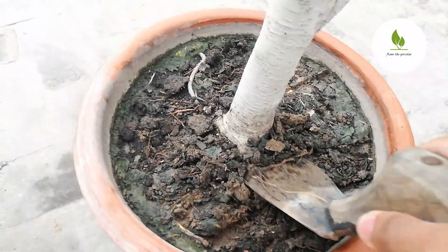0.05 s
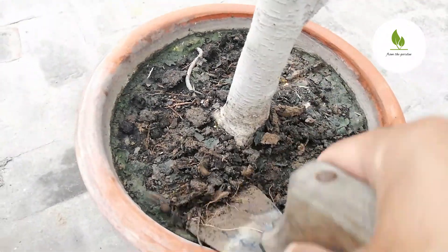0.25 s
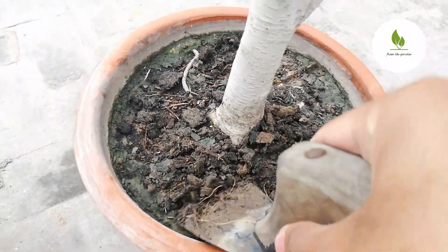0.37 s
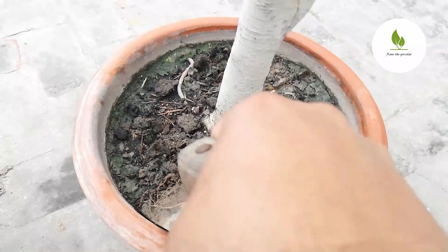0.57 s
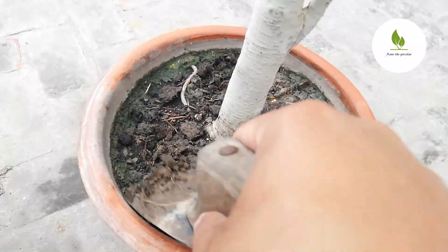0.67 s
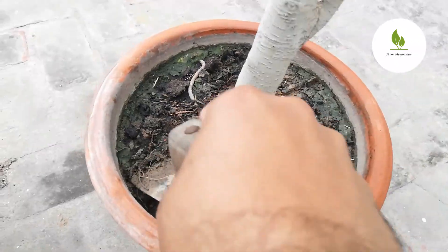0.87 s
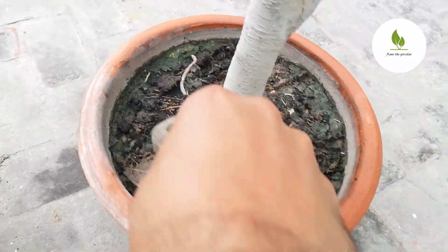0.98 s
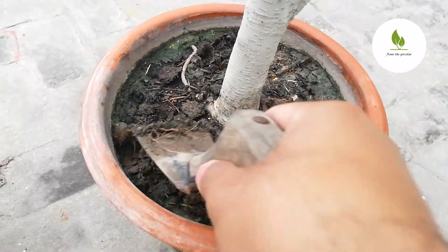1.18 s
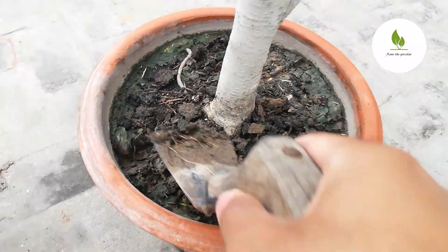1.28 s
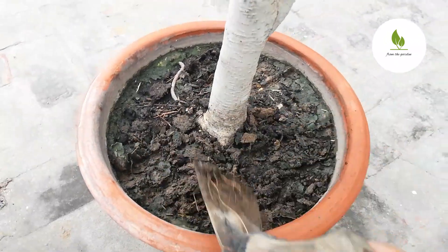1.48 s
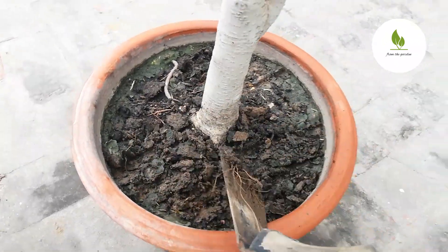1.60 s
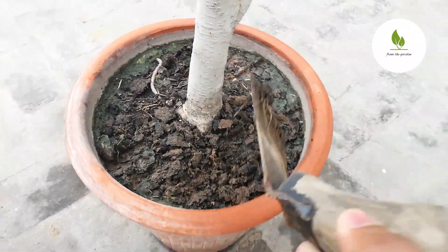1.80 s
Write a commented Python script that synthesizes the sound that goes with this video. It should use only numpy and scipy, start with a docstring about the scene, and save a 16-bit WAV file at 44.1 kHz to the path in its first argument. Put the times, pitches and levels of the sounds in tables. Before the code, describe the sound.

A small steel trowel knocks sharply against a clay pot of soil at about 0.2 seconds, close up. Short gritty scrapes and lighter, damped clinks follow until 0.8 seconds. Soil then rustles with a fine hiss and ticking crumbs, mostly on the left, until about 1.3 seconds. Two more hard knocks land near 1.4 and 1.55 seconds, then a faint clink. A low outdoor rumble runs underneath.

```python
"""A paved yard, close up on a small steel trowel working the soil in a clay pot.
The blade strikes the pot and knocks on clods, each contact a crack with a short, damped ring.
It scrapes along the gritty wall, and crumbs tick. A rustling hiss leans left over a low rumble.
Hard strikes clip the recorder and duck its gain."""
import sys
import numpy as np
from scipy import signal
from scipy.fft import rfft, irfft, next_fast_len
from scipy.io import wavfile
from scipy.ndimage import minimum_filter1d, map_coordinates

SR = 44100
rng = np.random.default_rng(int(sys.argv[2]) if len(sys.argv) > 2 else 0)


def dump_mix(stems):
    """Bounce the given channels to the path in sys.argv[1] as a 16-bit WAV at rate SR."""
    frames = np.atleast_2d(stems).T  # one column per channel
    limited = np.clip(frames, -1, 1)  # hard clip at full scale
    pcm = np.round(limited * 32767).astype(np.int16)
    wavfile.write(sys.argv[1], SR, pcm)


N = 81585

# Blade hits on pot and clods. Each row: start, skid and t60 in seconds, left lean in dB,
# the two most excited resonances in Hz, then six band levels in dB from low to high.
BLADE_HITS = [(0.2217, 0.0039, 0.0051, 2.5, 2976, 6240, -15.5, -11.5, -19, 0.5, -2, -7),
              (0.4292, 0.002, 0.038, 0.5, 870, 1410, -21, -35, -17.5, -20.5, -31.5, -27.5),
              (0.6592, 0.0015, 0.018, 1.5, 1643, 7000, -32, -45, -11.5, -24.5, -25, -24.5),
              (0.6737, 0.001, 0.02, 1, 1760, 8700, -31, -35, -24, -23.5, -27, -21),
              (0.6953, 0.00058, 0.021, 1, 1740, 8200, -25.5, -31, -9.5, -25, -28, -24.5),
              (0.7393, 0.0015, 0.036, 7, 1810, 8800, -19, -25, -12.5, -16.5, -22, -17),
              (1.4278, 0.0026, 0.014, 1, 2260, 6200, -24, -22, -10.5, -6.5, -4.5, -7),
              (1.465, 0.003, 0.033, -1, 2140, 4100, -48, -50, -35, -38, -45, -49),
              (1.5448, 0.0033, 0.02, 0, 4110, 9480, -23.5, -15, -10, -7.5, -9.5, -6.5),
              (1.6325, 0.0011, 0.097, 0.5, 1200, 1650, -36, -30.5, -33, -32, -39, -35)]


def knocks():
    """The blade hits the pot or a clod, skids for an instant and is damped at once."""
    out = np.zeros((2, N))
    for start, skid_s, t60, left_db, low_hz, high_hz, *band_dbs in BLADE_HITS:
        hit = contact(t60, (low_hz, high_hz), skid_s)
        add(out, start, lean(left_db) * voiced(hit, band_dbs, length_s=0.0023))
    return out


# Drags along the pot wall. Each row: time of full force, hold, rise and fall in seconds, left lean
# in dB, the two most excited resonances in Hz, then six band levels in dB from low to high.
BLADE_DRAGS = [(0.242, 0.0033, 0.011, 0.012, -0.5, 3080, 9900, -54, -34.5, -26.5, -29, -27, -21),
               (0.441, 0.049, 0.011, 0.0099, 0.5, 1460, 3440, -43, -41.5, -36, -33, -37, -36),
               (0.4935, 0.011, 0.014, 0.01, 0.5, 1457, 2690, -28, -26, -21.5, -19.5, -18, -20),
               (0.7469, 0.0088, 0.00049, 0.0023, -1, 2490, 8470, -25, -43, -20, -22.5, -15, -13)]


def scrapes(points=4):
    """Grit catches at several points of the blade and rings it as the force swells and lets go."""
    out, t = np.zeros((2, N)), np.arange(N) / SR
    for peak, hold, rise, fall, left_db, low_hz, high_hz, *band_dbs in BLADE_DRAGS:
        force = np.exp(np.minimum(t - peak, 0) / rise - np.maximum(t - peak - hold, 0) / fall)
        start = round(max(peak - .12, 0) * SR)
        rub = 0
        for _ in range(points):
            catches = force * grit(per_s=970, spread_db=6.5)
            ring = contact(t60=0.025, excited_hz=(low_hz, high_hz))
            rub += signal.fftconvolve(catches[None, start:start + SR // 3], ring, axes=1)
        add(out, start / SR, lean(left_db) * voiced(rub, band_dbs, hold + (rise + fall) / 2))
    return out


# The damped ring of blade and pot. Each row: pitch in Hz, level in dB, multiple of the contact's t60.
BLADE_POT_MODES = [(870, -3.5, 1.02), (1095, 4, 2.5), (1385, -0.5, 1.43), (1724, 7, 0.74), (1820, 6, 1.15),
                   (2513, -0.5, 1.36), (2920, -9.5, 1.64), (3559, -1, 2.2), (4180, -5.5, 0.61),
                   (5227, 2, 0.38), (6023, 3.5, 0.3), (7278, 2.5, 0.78), (8355, 3.5, 0.35),
                   (8844, 1.5, 0.39), (9690, 2.5, 0.2)]
# The tone of the crack. Each row: frequency in Hz, level in dB.
CRACK_EQ = [(150, -3.5), (500, -6), (1000, 10.5), (4000, 2.5), (9800, 2.5), (11200, -9), (13500, -10),
            (16000, -66)]
CRACK_DB, ATTACK_S, LIFT_DB, LIFT_OCTAVES = 12, 0.00072, 8, 0.098


def contact(t60, excited_hz, skid_s=0):
    """One touch of steel, in stereo: short modes and a noisy crack, sustained while the edge skids."""
    def lift(hz):
        return LIFT_DB * sum(np.exp(-(np.log2((hz + 1) / f) / LIFT_OCTAVES) ** 2) for f in excited_hz)

    t = np.arange(SR // 10) / SR
    free_s = np.maximum(t - skid_s, 0)
    modes = 0
    for hz, db, life in BLADE_POT_MODES:
        level_db = db + lift(hz) + rng.normal(0, 1.74, (2, 1)) - 60 * free_s / (t60 * life)
        cycles = hz * t + rng.random() + rng.normal(0, 0.11, (2, 1))
        modes += amp(level_db) * np.sin(2 * np.pi * cycles)
    noise = filtered(rng.standard_normal((2, len(t))), lambda hz: amp(lift(hz)))
    crack = amp(CRACK_DB - 60 * free_s / t60) * coloured(noise, CRACK_EQ)
    return (modes + crack) * (1 - np.exp(-t / ATTACK_S))


# The edges of the six voicing bands in Hz, low to high.
BANDS_HZ = [200, 930, 1250, 2600, 4600, 7800, 15000]


def voiced(x, band_dbs, length_s):
    """The point of contact sets each band's level, with its energy counted over length_s."""
    out = 0
    for lo, hi, db in zip(BANDS_HZ, BANDS_HZ[1:], band_dbs):
        band = signal.sosfilt(signal.butter(4, [lo, hi], "band", fs=SR, output="sos"), x)
        rms = np.sqrt(np.sum(band ** 2, axis=1, keepdims=True) / (length_s * SR))
        out += amp(db) * band / rms
    return out


# Crumbs flicked off the blade. Each row: start in seconds, level in dB.
CRUMB_TICKS = [(0.029, -25.5), (0.551, -14.5), (0.812, -25), (1.1065, -10.5), (1.198, -11), (1.337, -24)]
# The fader ride on the hiss. Each row: time in seconds, level in dB.
HISS_RIDE = [(0, -38.5), (.18, -37), (.35, -40), (.6, -35.5), (.78, -23.5), (.87, -31), (.98, -28),
             (1.15, -27.5), (1.27, -28), (1.39, -36), (1.6, -39), (1.85, -36)]
# The bright tone of hiss and ticks. Each row: frequency in Hz, level in dB.
HISS_EQ = [(1500, -20.5), (3000, -15), (4300, -5.5), (7000, -5.5), (9600, 0.5), (11000, -9), (13500, -14.5),
           (15000, -30)]
# The hiss's pull to the left. Each row: frequency in Hz, cut on the right in dB.
RIGHT_CUT = [(1500, 11), (3300, 10), (5800, 10), (7500, 11.5), (10000, 19), (14000, 10)]
GRAIN_DB, FLICKER_DB, TICK_T60_S = -1.5, 1.75, 0.0081


def rustle():
    """A fine, flickering, grainy hiss with a few louder ticks, mostly on the left."""
    grains = np.array([grit(per_s=700, spread_db=5) for _ in range(2)])
    bed = coloured(rng.standard_normal((2, N)) + amp(GRAIN_DB) * grains, HISS_EQ)
    out = bed * amp(curve(HISS_RIDE) + FLICKER_DB * wobble(knots_per_s=59.95))
    t = np.arange(SR // 20) / SR
    for start, db in CRUMB_TICKS:
        burst = coloured(rng.standard_normal((2, len(t))), HISS_EQ)
        add(out, start, amp(db - 60 * t / TICK_T60_S) * burst)
    left, right = out
    return np.array([left, filtered(right, lambda hz: amp(-along(RIGHT_CUT, hz)))])


# The yard's decay. Each row: frequency in Hz, t60 in seconds.
YARD_DECAY = [(200, 0.6), (1100, 0.33), (1900, 0.15), (4000, 0.19), (12000, 0.081)]
TAIL_DB, WALL_DB, WALL_DELAY_S, WALL_SPREAD_S = -13, -23, 0.015, 0.051


def yard(x):
    """A scattered slap off the nearest wall and a short, faint tail."""
    hz, t, spectra = signal.stft(rng.standard_normal((2, SR // 2)), SR, nperseg=256)
    decay = amp(-60 * t / along(YARD_DECAY, hz)[:, None])
    tail = signal.istft(spectra * decay, SR, nperseg=256)[1]
    late = np.arange(tail.shape[1]) / SR - WALL_DELAY_S
    wall = rng.standard_normal(tail.shape) * (late > 0) * np.exp(-np.abs(late) / WALL_SPREAD_S)
    impulse = amp(TAIL_DB) * tail / np.linalg.norm(tail[0])
    impulse += amp(WALL_DB) * wall / np.linalg.norm(wall[0])
    return signal.fftconvolve(x, impulse, axes=1)[:, :N]


# The fader ride on the rumble. Each row: time in seconds, level in dB.
RUMBLE_RIDE = [(0, -33), (.13, -33.5), (.22, -41), (.42, -35), (.58, -38), (.68, -31), (.83, -37),
               (.93, -27.5), (1.08, -36.5), (1.2, -35), (1.36, -37), (1.55, -41), (1.85, -39)]
# The tones of the rumble and the air. Each row: frequency in Hz, level in dB.
RUMBLE_EQ = [(15, -38), (30, -5.5), (102, -10), (119, 6), (129, -5.5), (140, -0.5), (168, -9), (205, -15),
             (265, -13.5), (400, -27), (700, -50)]
AIR_EQ = [(100, 7), (400, 3), (1000, 3.5), (2500, -0.5), (6000, -6), (10000, -20), (15000, -16)]


def background(air_db=-44):
    """A low rumble in the centre and thin, wide outdoor air."""
    rumble = coloured(rng.standard_normal(N), RUMBLE_EQ) * amp(curve(RUMBLE_RIDE))
    return rumble + amp(air_db) * coloured(rng.standard_normal((2, N)), AIR_EQ)


def grit(per_s, spread_db):
    """Random tiny impacts of uneven size, at rms 1."""
    impacts = (rng.random(N) < per_s / SR) * rng.choice([-1, 1], N)
    return unit(impacts * amp(spread_db * np.clip(rng.standard_normal(N), -2, 2)))


def amp(db):
    """Decibels to gain."""
    return 10 ** (np.asarray(db) / 20)


def unit(x):
    """x scaled to rms 1."""
    return x / np.sqrt(np.mean(x ** 2) + 1e-20)


def along(points, hz):
    """(Hz, value) points read on a log axis."""
    f, v = np.transpose(points)
    return np.interp(np.log(hz + 1), np.log(f + 1), v)


def curve(rows):
    """(s, value) points joined up, one value per sample."""
    return np.interp(np.arange(N) / SR, *np.transpose(rows))


def wobble(knots_per_s):
    """A smooth random curve."""
    return map_coordinates(rng.standard_normal(400), [np.arange(N) * knots_per_s / SR], mode="wrap")


def filtered(x, response):
    """x through a frequency response."""
    n = x.shape[-1]
    size = next_fast_len(n + SR // 10)
    return irfft(rfft(x, size) * response(np.fft.rfftfreq(size, 1 / SR)), size)[..., :n]


def coloured(x, eq):
    """x through an EQ curve, at rms 1."""
    return unit(filtered(x, lambda hz: amp(along(eq, hz))))


def lean(left_db):
    """Left and right gains, left_db apart."""
    return amp(np.array([[.5], [-.5]]) * left_db)


def add(out, start_s, x):
    """Mix x into out from start_s."""
    part = out[:, round(start_s * SR):][:, :x.shape[1]]
    part += x[:, :part.shape[1]]


# The trowel's stereo tilt, duller on the right. Each row: frequency in Hz, left lean in dB.
MIC_SHADE = [(500, -3.5), (2500, 2), (4000, 5), (7000, 4), (9000, 11), (13000, 8)]
LEFT_DELAY_S = .00007


def scene():
    """The mix: the trowel reaches the right mic first and the left mic brighter."""
    def mics(hz):
        delay = np.exp(-2j * np.pi * hz * np.array([[LEFT_DELAY_S], [0]]))
        return lean(along(MIC_SHADE, hz)) * delay

    trowel = filtered(knocks() + scrapes(), mics)
    return trowel + yard(trowel) + rustle() + background()


THRESHOLD_DB, DUCK_SLOPE, RECOVER_DB_PER_S = -17, 0.49, 24
DETECT_S, DUCK_ATTACK_S, HOLD_S, TOP_HZ = 0.0063, 0.0038, 0.086, 15400


def record(dry):
    """Gain control ducks after loud blows, holds and recovers; the blows themselves clip."""
    def follow(x, lag_s):
        pole = np.exp(-1 / (lag_s * SR))
        return signal.lfilter([1 - pole], [1, -pole], x)

    level_db = 10 * np.log10(follow(np.mean(dry ** 2, axis=0), DETECT_S) + 1e-12)
    cut_db = DUCK_SLOPE * np.maximum(level_db - THRESHOLD_DB, 0)
    half = int(HOLD_S * SR / 2)
    held_db = -minimum_filter1d(-cut_db, 2 * half + 1, origin=half, mode="constant")
    recovery_db = RECOVER_DB_PER_S * np.arange(N) / SR
    duck_db = np.maximum.accumulate(held_db + recovery_db) - recovery_db
    clipped = np.clip(dry * amp(-follow(duck_db, DUCK_ATTACK_S)), -1, 1)
    return filtered(clipped, lambda hz: 1 / (1 + (hz / TOP_HZ) ** 60))  # steep low-pass


dry = scene()
out = record(dry)
dump_mix(out)
```